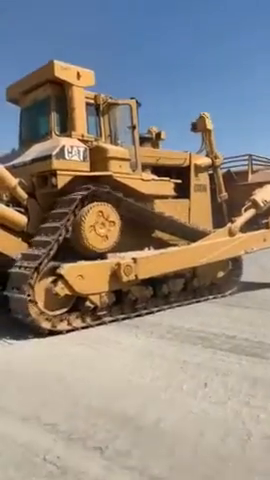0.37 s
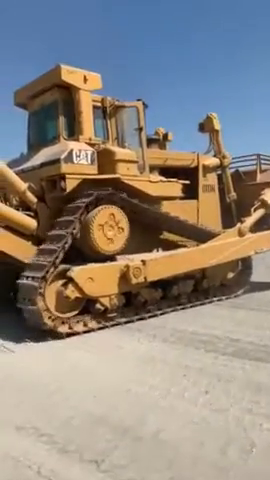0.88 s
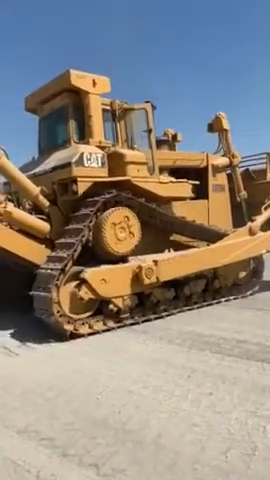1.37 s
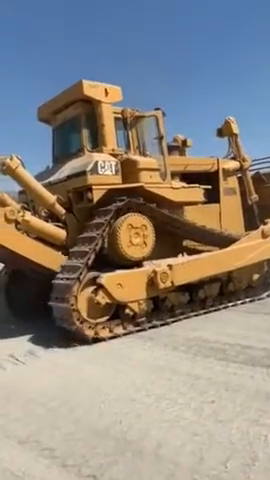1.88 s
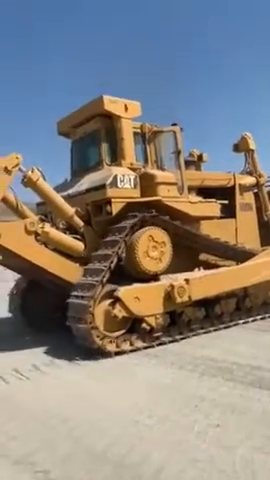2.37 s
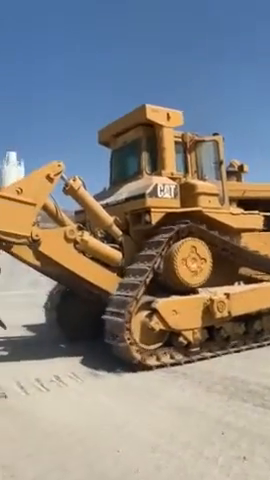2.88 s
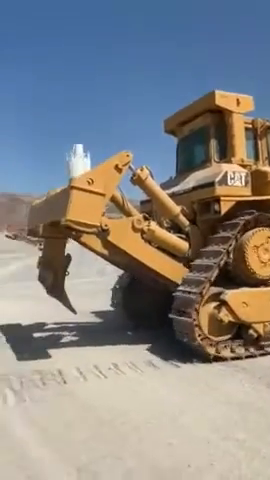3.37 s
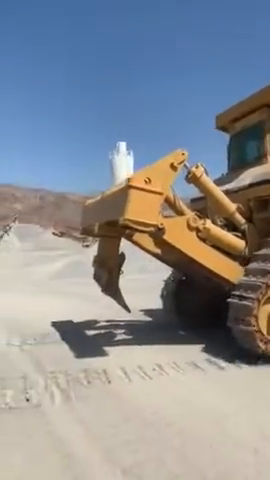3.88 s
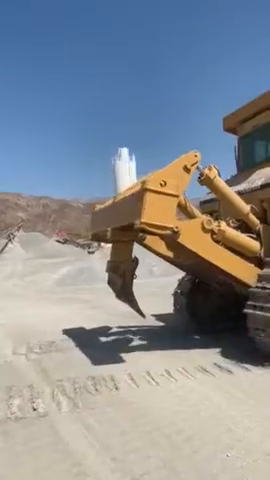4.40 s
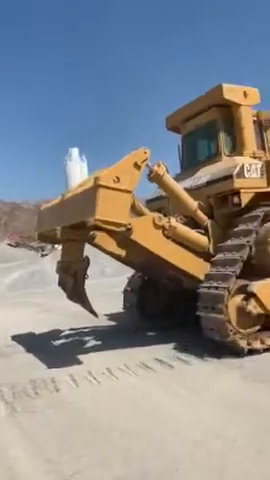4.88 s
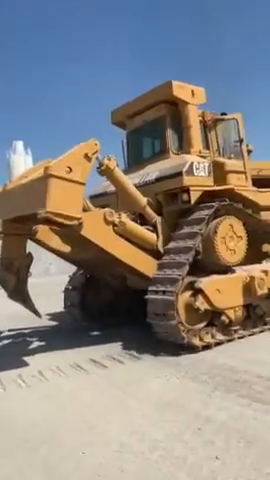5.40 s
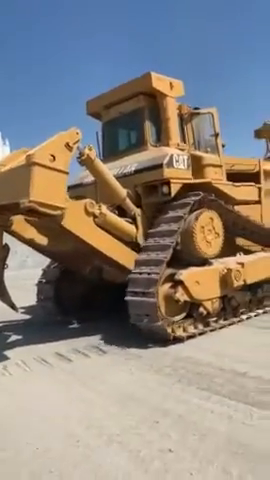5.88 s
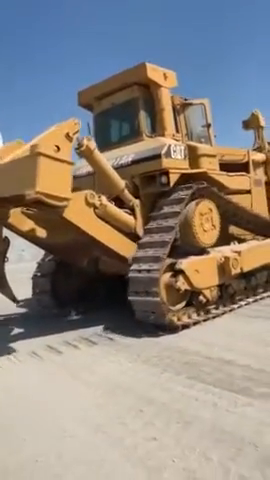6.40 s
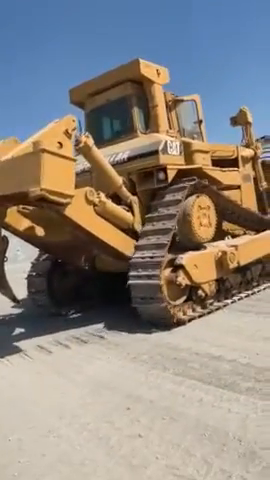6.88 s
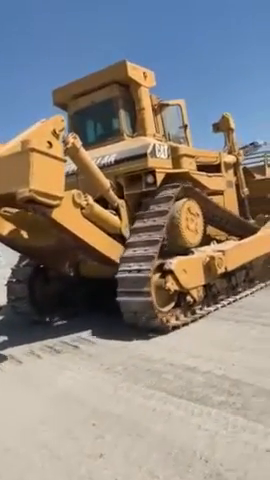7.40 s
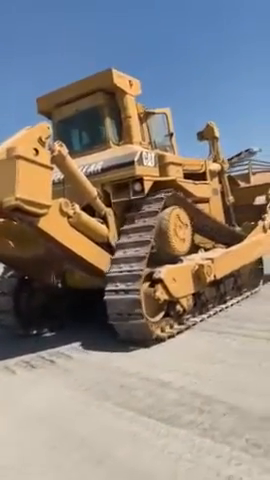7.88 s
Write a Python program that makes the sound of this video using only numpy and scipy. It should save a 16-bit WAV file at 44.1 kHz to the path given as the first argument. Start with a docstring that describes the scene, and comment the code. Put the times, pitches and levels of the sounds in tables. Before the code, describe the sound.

A large bulldozer diesel idles steadily in an open yard, heard close by a handheld stereo microphone moving from its side round to the rear. A low, even hum sits under dense metallic clatter and airy intake noise. Wind bumps the microphone in soft low puffs; a few dull crunches and tiny ticks come nearby. A faint whine slides slightly down around three seconds.

```python
"""A twelve-cylinder diesel idles in a yard as the listener walks from its side round its tail.
From the start: exhaust and gear sines, firings and contacts ringing block and panel, clatter and intake noise,
a loose rattle, and a breeze of low noise that gusts and puffs at two microphone ports.
Ticks (filtered clicks) and hisses (noise bursts) come from 0.1 s, pops of air from 0.5 s, crunches (noise
with ringing) from 1.4 s; a sine whine slides down after 2.3 s, as the corner is passed."""
import sys
import numpy as np
from scipy import signal
from scipy.fft import rfft, irfft, next_fast_len
from scipy.io import wavfile

SR = 44100
rng = np.random.default_rng(int(sys.argv[2]) if len(sys.argv) > 2 else 0)


def boost(x):
    """Linear amplitude factor 10**(x/20) for a level x in decibels (scalar or array-like)."""
    u = np.asarray(x, float) / 20
    return 10 ** u


def output_pcm(signal):
    """Save a mono or channel-first signal as 16-bit PCM at the path in sys.argv[1].

    Samples are clipped to [-1, 1] before scaling.
    """
    pcm = np.clip(np.atleast_2d(signal).T, -1, 1) * 32767
    wavfile.write(sys.argv[1], SR, np.round(pcm).astype(np.int16))


N = 353676

# Engine speed. Each row: time in seconds, firings per second.
SPEED = [(0, 96.4), (.5, 96.2), (1.25, 96.3), (1.75, 97.7), (2.05, 98.0), (2.4, 96.7), (3, 96.4),
         (3.5, 96.05), (4.5, 95.9), (5.25, 95.5), (6.5, 95.3), (7, 95.05), (8.02, 94.8)]
# The walk. Each row: time in seconds, place (0 beside, 1 corner, 2 and over behind).
WALK = [(0, 0.033), (2.2, 0.25), (2.7, 0.4), (3.3, 0.87), (4.8, 1.23), (5.6, 2.24), (8.02, 1.43)]

# Firings of one cycle. Each row: relative strength in dB, timing offset in firing gaps.
CYLINDERS = [(-4, 0.17), (11, 0.14), (27.5, -0.074), (-5, 0.018), (-3, 0.042), (3, 0.18), (-20, -0.18),
             (-20, -0.0085), (-12, 0.09), (11, 0.26), (21, -0.061), (2, 0.093)]

# Firing hum as the exhaust stack turns away. Each row: time in seconds, level in dB rms.
HUM = [(0, -17), (1.8, -17.5), (3.7, -17.5), (4.4, -20), (5.5, -18.5), (6.2, -20.5), (7.5, -24),
       (8.02, -20)]
# Brief sinking of the hum, mostly in head-on gusts. Each row: middle in seconds, length in seconds, change in dB.
HUM_DIPS = [(.47, .14, -2.5), (1.07, .1, -5), (2.22, .17, -14), (2.44, .2, -5), (4.8, .2, -2.5),
            (5.16, .14, -5.5), (5.63, .14, -4.5), (6.08, .17, -8), (6.53, .1, -5), (7.1, .12, -3)]
# Steady exhaust and gear tones, in multiples of the four-stroke cycle rate.
TONE_ORDERS = [6, 13, 15, 17, 18, 21, 24, 27, 32, 36, 42, 50, 51, 54, 61, 63, 69, 72, 78, 102, 105, 132,
               134]
# The same tones. Each row: level in dB rms beside, at the corner, behind.
TONES = [(-43, -35, -39), (-36, -30, -38), (-29, -30, -39.5), (-35, -32.5, -40.5), (-38, -47, -52),
         (-39, -36.5, -43), (-33, -30, -33), (-36.5, -35, -47.5), (-59, -33, -29.5), (-47, -41, -44),
         (-44, -41, -46), (-37.5, -39, -44), (-36.5, -40, -43), (-31, -30.5, -44.5), (-46, -36, -46),
         (-44, -40, -40), (-40.5, -44, -41), (-38, -39, -45), (-52, -42.5, -44), (-48, -31.5, -36),
         (-38, -41, -50), (-44, -40, -36), (-52, -42, -36.5)]
TONE_WOBBLE_TURNS_PER_ORDER = 0.0025

# Resonances of block and panels: centres in Hz.
BLOCK_HZ = [433, 505, 680, 800, 960, 1055, 1350, 1850, 2650]
# The same resonances. Each row: width in Hz, relative level in dB beside, at the corner, behind.
BLOCK = [(39.5, -4, 0, -4.5), (41, -0.5, -3.5, -3.5), (79, -6, -2.5, -3), (107, -1.5, -3.5, -4),
         (50, -4.5, -10.5, -17), (45.4, -9.5, -5.5, -9), (114, -11.5, -6, -10.5), (82.6, -7, -5.5, -8),
         (200, -21, -13, -16.5)]
# Knock level is before shading; firing and noise shares are relative to the contacts.
KNOCK_DB, KNOCK_NOISE_SHARE, KNOCK_FIRING_SHARE = -23.5, 1.2, 0.23

# Spectrum of clatter, fan and air noise. Each row: frequency in Hz, relative density in dB per Hz.
CLATTER = [(40, 10), (120, 8), (250, 2), (450, 2), (600, -1.5), (800, -1), (1200, 0.5), (1600, -2.5),
           (1900, -4.5), (2300, -10), (3000, -12.5), (4300, -20), (5200, -16), (6300, -22), (8400, -24.5),
           (11500, -29)]
CLATTER_DB, GATE_DEPTH = -22.5, .06  # level before shading; swell per rms of the firing envelope

# Air whistling through the intake: level before shading, in dB beside, at the corner, behind.
INTAKE_DB = (-36.5, -34, -36.5)
# Centre of the whistle. Each row: time in seconds, frequency in Hz.
INTAKE_PITCH = [(0, 3600), (1.0, 3700), (1.4, 3700), (2.2, 3400), (2.45, 3450), (2.65, 3650), (3.0, 3500),
                (5, 3550), (8.02, 3600)]
INTAKE_POLE_WIDTH_HZ = 440

# A rear panel drums. Each row: time in seconds, level in dB before throb and shading.
PANEL = [(0, -35), (2.2, -35), (2.6, -44), (5.9, -44), (6.35, -27.5), (7.2, -27.5), (8.02, -29)]
PANEL_HZ, PANEL_WIDTH_HZ, PANEL_THROB_DB = 792, 45, 4

# A blow three times a cycle: level before shading, in dB beside, at the corner, behind.
THRICE_DB = (-26, -27, -28)
# Its spectrum. Each row: frequency in Hz, relative density in dB per Hz.
THRICE_COLOUR = [(150, -7), (300, -0.5), (450, 0), (800, 3), (1100, -5), (1900, -12.5), (2600, -12),
                 (5000, -36)]
THRICE_DECAY_S = .025  # at 8 cycles per second
THRICE_FRESH, THRICE_UNEVEN_DB = .6, 2  # share of new noise; spread of strength between blows

# Shading of the machine noise in low, middle, top: dB beside, at the corner, behind.
LOW_SHADE_DB = (0.53, -1.9, 0.86)
MIDDLE_SHADE_DB = (0.78, -1.4, 0.08)
TOP_SHADE_DB = (.2, 0.32, -.2)
# Random waver of the shading: dB in low, middle, top.
SHADE_WAVER_DB = (.7, .35, .5)

# A loose metal part: level in dB rms beside, at the corner, behind.
RATTLE_DB = (-47, -54, -37)
RATTLE_HZ, RATTLE_WIDTH_HZ, RATTLES_PER_S = 2670, 230, 20

# Head-on gusts, rumbling on both ports. Each row: middle in seconds, length in seconds, level in dB.
GUSTS = [(.45, 0.13, -15), (.6, 0.1, -28), (1.07, 0.12, -23), (2.07, 0.055, -32), (2.22, 0.17, -29),
         (2.4, 0.18, -26), (4.82, 0.25, -33), (5.12, 0.3, -27.5), (5.63, 0.33, -26.5), (5.85, 0.1, -22),
         (6.1, 0.12, -32), (6.25, 0.18, -27), (6.53, 0.043, -23), (7.1, 0.12, -30), (7.57, 0.061, -39)]
# Spectrum of the rumble. Each row: frequency in Hz, relative density in dB per Hz.
BUFFET = [(20, 2), (45, 10.5), (70, 19.5), (110, 10.5), (200, 4.5), (400, -39)]
# Pitched puffs. Each row: middle in seconds, length in seconds, level in dB, centre in Hz.
PUFFS = [(0.18, 0.25, -25, 169), (1.118, 0.085, -18, 154), (1.29, 0.17, -24.5, 167), (2.116, 0.11, -13, 45),
         (2.18, 0.24, -19, 154), (2.34, 0.19, -26, 35), (3.854, 0.2, -25.5, 155), (4.348, 0.092, -28, 297),
         (4.613, 0.15, -18.5, 175), (4.95, 0.46, -24.5, 330), (5.11, 0.23, -21.5, 150),
         (5.295, 0.42, -30.5, 322), (5.92, 0.084, -27, 158), (6.53, 0.2, -28, 335),
         (6.708, 0.081, -27, 141), (7.67, 0.1, -26, 278), (7.794, 0.08, -23, 200),
         (7.882, 0.093, -19.5, 170), (7.983, 0.15, -24, 125)]
PUFF_SPAN = 1.48  # a puff's band runs from its centre over this to its centre times this
# Spectrum of the flutter. Each row: frequency in Hz, relative density in dB per Hz.
FLUTTER = [(60, -13), (130, -1.5), (200, -8), (350, -8), (600, -28.5), (1000, -74)]
# Cross gusts, pushing the ports apart. Each row: middle in seconds, length in seconds, level in dB.
CROSS = [(.42, 0.083, -34), (.88, 0.13, -22), (1.2, 0.17, -37), (2.62, 0.27, -31), (3.1, 0.083, -39),
         (3.37, 0.091, -29), (3.53, .1, -29), (5.5, 0.13, -29), (5.84, 0.14, -27), (6.1, 0.26, -30),
         (7.2, 0.081, -29), (7.4, 0.29, -23), (7.7, 0.27, -27), (7.92, 0.21, -31)]
# Spectrum of the cross part. Each row: frequency in Hz, relative density in dB per Hz.
CROSS_COLOUR = [(25, -19), (60, -4), (100, 10), (200, -1), (350, -3), (600, -57)]
CALM_DB, CALM_FLUTTER_DB, CALM_CROSS_DB, CALM_WAVER_DB = -31.5, -30.5, -51, 1

# Sharp ticks. Each row: time in seconds, relative click level in dB before filtering.
TICKS = [(.1135, -15), (.128, -19), (5.6997, -11), (6.258, -18)]
TICK_LOW_HZ, TICK_HIGH_HZ = 1000, 11000
TICK_BODY_HZ, TICK_BODY_T60_S, TICK_BODY_DB = 1200, .008, -2

# Bright hisses. Each row: start in seconds, relative level in dB, length in seconds.
HISS = [(.126, -22.5, .034), (3.855, -35, .012), (5.696, -21, .012), (6.065, -35, .02), (6.255, -27, .015)]
# Their spectrum. Each row: frequency in Hz, relative density in dB per Hz.
HISS_COLOUR = [(1000, -8), (2500, 2), (5000, -1), (7000, 0), (12000, -2), (14000, -30)]

# Single pops of the breeze. Each row: time in seconds, signed height, width in seconds.
POPS = [(.461, -.3, .003), (1.209, -.3, .002), (2.136, -.3, .002), (2.163, -.5, .002), (2.332, .6, .0025),
        (2.439, -.4, .002), (6.195, .3, .003)]

# Dull crunches nearby. Each row: start in seconds, relative level in dB, length in seconds.
CRUNCH = [(1.425, -8.5, .04), (2.214, -6.5, .04), (4.365, -15, .03), (4.6, -15, .05), (5.035, -11, .035)]
# Their spectrum. Each row: frequency in Hz, relative density in dB per Hz.
CRUNCH_COLOUR = [(150, -18), (400, 0), (900, -2), (1900, -8), (2600, -19), (6000, -40)]
# What they ring with. Each row: centre in Hz, width in Hz, relative level in dB.
CRUNCH_RING = [(436, 45, 0), (850, 60, -2.5), (1150, 90, -6), (1560, 80, -7), (1790, 80, -5)]
CRUNCH_RING_DB = 0  # ring over plain crunch

# A whine that slides down as the corner is passed. Each row: time in seconds, pitch in Hz, level in dB rms.
WHINE = [(0, 990, -70), (2.3, 990, -60), (2.45, 970, -36), (2.65, 975, -31.5), (2.95, 968, -32),
         (3.06, 940, -31), (3.2, 940, -33), (3.3, 940, -41), (3.45, 938, -36), (3.65, 942, -36),
         (3.9, 935, -60), (8.02, 935, -70)]

# The two ports. Each row: frequency in Hz, lead of the left in radians, power share of unshared sound.
PORTS = [(30, 0, .01), (150, -.2, .05), (300, -.45, .1), (750, -.9, .16), (1400, -.08, .003),
         (1750, .03, .003), (2400, .4, .3), (3100, 1.3, .7), (3600, 2.3, .45), (4150, 2.6, .3),
         (4600, 2.9, .1), (5100, 3.14, .025), (5600, 3.45, .05), (6000, 4.3, .2), (6600, 5.8, .08),
         (7200, 6.22, .004), (9300, 6.35, .004), (10000, 7.4, .3), (10500, 8.8, .15), (10900, 9.42, .002)]

# Brief sinking of the low middle, mostly in cross gusts. Each row: middle in seconds, length in seconds,
# change in dB.
LOW_DIPS = [(.86, .12, -6), (2.59, .14, -10), (3.6, .1, -5), (5.85, .2, -4), (7.2, .15, -4),
            (7.39, .13, -8.5)]
DIP_LOW_HZ, DIP_HIGH_HZ = 200, 605

CEILING = 1.7  # height that rounded peaks approach


def rms_one(x):
    """Scale to rms 1."""
    return x / np.sqrt(np.mean(x ** 2) + 1e-20)


def in_time(rows):
    """Columns of a curve, one value a sample."""
    s, *columns = np.transpose(rows)
    return [np.interp(np.arange(N) / SR, s, c) for c in columns]


def drift(rate_hz):
    """Slow random curve with spread 1: noise through two equal poles, made at every 40th sample."""
    r = np.exp(-80 * np.pi * rate_hz / SR)
    noise = rng.standard_normal(N // 40 + 2002)
    slow = signal.lfilter([1], [1, -2 * r, r * r], noise)[2000:]
    return np.interp(np.arange(N) / 40, np.arange(len(slow)), rms_one(slow))


def colour(x, spectrum):
    """Weight x by a spectrum of (Hz, dB) points; rms 1."""
    size = next_fast_len(N)
    hz = np.maximum(np.arange(size // 2 + 1) * SR / size, 1)
    point_hz, point_db = np.transpose(spectrum)
    gain = boost(np.interp(np.log(hz), np.log(point_hz), point_db))
    return rms_one(irfft(rfft(x, size) * gain, size)[..., :N])


def band(x, low_hz, high_hz):
    """Band-pass."""
    return signal.sosfilt(signal.butter(2, [low_hz, high_hz], "band", fs=SR, output="sos"), x)


def resonate(x, hz, width_hz):
    """A two-pole resonance; rms 1."""
    r = np.exp(-np.pi * width_hz / SR)
    return rms_one(signal.lfilter([1, 0, -1], [1, -2 * r * np.cos(2 * np.pi * hz / SR), r * r], x))


def seen_from(place, levels):
    """Value for the listener's place, between beside, corner and behind."""
    return np.interp(place, [0, 1, 2], levels)


def swell(middle_s, length_s):
    """A smooth rise and fall, 1 at its middle, 1/e at half a length either side."""
    out = np.zeros(N)
    first = max(int((middle_s - 2 * length_s) * SR), 0)
    last = min(int((middle_s + 2 * length_s) * SR), N)
    near = np.arange(first, last)
    out[near] = np.exp(-(2 * (near / SR - middle_s) / length_s) ** 2)
    return out


def dips(rows):
    """Level change in dB through time."""
    return sum(np.minimum(db, 0) * swell(s, length_s) for s, length_s, db in rows)


def firings(cycle):
    """One click a firing, with its cylinder's strength and timing plus scatter."""
    count = np.arange(int(12 * cycle[-1]) - 1)
    strength_db, offset = np.array(CYLINDERS)[count % 12].T
    chance = rng.standard_normal((len(count), 2))
    at = np.interp(count + .5 + offset, 12 * cycle, np.arange(N)) + 3.0 * chance[:, 0]
    clicks = np.zeros(N)
    clicks[np.clip(at.astype(int), 0, N - 1)] = boost(strength_db + 1.0 * chance[:, 1])
    return clicks


def valve_gear(cycle):
    """Small contacts as noise that repeats every cycle, part of it three times a cycle."""
    once = rng.standard_normal(1536)
    thrice = np.tile(rng.standard_normal(512), 3)
    return rms_one((once + .4 * thrice)[(cycle * 1536).astype(int) % 1536])


def tones(cycle, hum_db, place):
    """Exhaust and gear orders as sines locked to the cycle, wavering a little."""
    out = np.sqrt(2) * boost(hum_db + .6 * drift(5)) * np.sin(2 * np.pi * 12 * cycle)
    starts = rng.random(len(TONES))
    for order, levels_db, start in zip(TONE_ORDERS, TONES, starts):
        level_db = seen_from(place, levels_db) + 1.5 * drift(1.5)
        turns = order * (cycle + TONE_WOBBLE_TURNS_PER_ORDER * drift(2.32)) + start
        out += np.sqrt(2) * boost(level_db) * np.sin(2 * np.pi * turns)
    return out


def knock(clicks, contacts, place):
    """Pressure rises, valve gear and loose noise ring the block and panels; rms 1."""
    drive = KNOCK_FIRING_SHARE * rms_one(clicks) + contacts + KNOCK_NOISE_SHARE * rng.standard_normal(N)
    out = 0
    for k, (hz, (width_hz, *levels_db)) in enumerate(zip(BLOCK_HZ, BLOCK)):
        sign = (-1) ** k
        out = out + sign * boost(seen_from(place, levels_db)) * resonate(drive, hz, width_hz)
    return rms_one(out)


def clatter(gate, patchy_db):
    """Three unrelated noises swell with each firing; octaves flicker partly together, partly alone."""
    white = rng.standard_normal((2, 3, N)) * gate
    out, together = 0, drift(12.3)
    for k, low_hz in enumerate(32 * 2. ** np.arange(9)):
        flicker = boost(patchy_db * (0.5 * together + drift(20)))
        out = out + flicker * band(white[k % 2], low_hz, 2 * low_hz)
    return colour(out, CLATTER)


def intake(place):
    """Slow turbulence carried on the duct pitch: three unrelated narrow noises."""
    air = rng.standard_normal((2, 3, N))
    for _ in range(2):
        air = signal.lfilter([1], [1, -np.exp(-np.pi * INTAKE_POLE_WIDTH_HZ / SR)], air)
    phase = 2 * np.pi * np.cumsum(in_time(INTAKE_PITCH)[0]) / SR
    whistle = rms_one(air[0] * np.cos(phase) + air[1] * np.sin(phase))
    return boost(seen_from(place, INTAKE_DB) + 1.93 * drift(21)) * whistle


def panel(cycle, contacts):
    """Gear contacts and noise ring one panel, throbbing once a cycle."""
    drive = contacts + 1.4 * rng.standard_normal(N)
    throb_db = PANEL_THROB_DB * np.sin(2 * np.pi * cycle) + 2 * drift(10)
    return boost(in_time(PANEL)[0] + throb_db) * resonate(drive, PANEL_HZ, PANEL_WIDTH_HZ)


def thrice_a_cycle(cycle, place):
    """A ragged dying noise returns three times a cycle; each side of the machine has its own."""
    step = (cycle * 3072).astype(int) % 1024
    dying = np.exp(-np.arange(1024) / (24576 * THRICE_DECAY_S))
    blows = rng.standard_normal((3, 1024))
    strengths = boost(THRICE_UNEVEN_DB * rng.standard_normal(int(3 * cycle[-1]) + 1))
    strength = strengths[(3 * cycle).astype(int)]
    # power crossfade between the three sides
    heard = sum(np.sqrt(seen_from(place, share)) * blow[step] for share, blow in zip(np.eye(3), blows))
    heard = strength * dying[step] * (heard + THRICE_FRESH * rng.standard_normal(N))
    return boost(seen_from(place, THRICE_DB) + drift(3.8)) * colour(heard, THRICE_COLOUR)


def on_the_way(x, place):
    """Low, middle and top of the machine noise are shaded differently along the walk."""
    low = signal.lfilter(*signal.butter(2, 620, fs=SR), x)
    top = signal.lfilter(*signal.butter(2, 4500, "high", fs=SR), x)
    shades_db = (LOW_SHADE_DB, MIDDLE_SHADE_DB, TOP_SHADE_DB)
    swing = [boost(seen_from(place, shade_db) + waver_db * drift(2.2))
             for shade_db, waver_db in zip(shades_db, SHADE_WAVER_DB)]
    return swing[0] * low + swing[1] * (x - low - top) + swing[2] * top


def rattle(place):
    """A loose part chinks at random: dying noise bursts through one resonance."""
    hits = (rng.random(N) < RATTLES_PER_S / SR) * rng.standard_normal(N)
    envelope = signal.lfilter([1], [1, -np.exp(-1 / (0.04 * SR))], np.abs(hits))
    shaken = envelope * rng.standard_normal(N)
    return boost(seen_from(place, RATTLE_DB)) * resonate(shaken, RATTLE_HZ, RATTLE_WIDTH_HZ)


def gusting(rows, calm_db):
    """Gain of a wavering calm plus its gusts."""
    calm = boost(calm_db + CALM_WAVER_DB * drift(4.4))
    return calm + sum(boost(db) * swell(s, length_s) for s, length_s, db in rows)


def breeze():
    """Lumpy low noise: one part common to both ports, one of opposite sign at each."""
    lumps = rng.standard_normal((3, N)) * boost(1.8 * drift(14))
    flutter = colour(lumps[1], FLUTTER)
    common = gusting(GUSTS, CALM_DB) * colour(lumps[0], BUFFET)
    common += boost(CALM_FLUTTER_DB + CALM_WAVER_DB * drift(5.0)) * flutter
    for s, length_s, db, hz in PUFFS:
        shape = swell(s, length_s)
        puff = shape * band(flutter, hz / PUFF_SPAN, hz * PUFF_SPAN)
        common += boost(db) * puff * np.sqrt(np.sum(shape ** 2) / np.sum(puff ** 2))
    cross = gusting(CROSS, CALM_CROSS_DB) * colour(lumps[2], CROSS_COLOUR)
    return common, cross * [[1], [-1]]


def ticks():
    """Lone clicks over a wide treble band, each with a short ring."""
    clicks = np.zeros(N)
    for s, db in TICKS:
        clicks[int(s * SR)] = -2 * boost(db)
    r, w = boost(-60 / (TICK_BODY_T60_S * SR)), 2 * np.pi * TICK_BODY_HZ / SR
    body = signal.lfilter([0, np.sin(w)], [1, -2 * r * np.cos(w), r * r], clicks + 1e-18)
    return band(clicks, TICK_LOW_HZ, TICK_HIGH_HZ) + boost(TICK_BODY_DB) * body


def bursts(rows, spectrum, grain_db):
    """Short grainy noise bursts with a quick rise and a dying end."""
    shape, t = np.zeros(N), np.arange(N) / SR
    for s, db, length_s in rows:
        u = np.maximum(t - s, 0) / length_s
        shape += boost(db) * .5 * np.minimum(8 * u, 1) * np.exp(-u ** 3)
    grains = rng.standard_normal(N) * boost(grain_db * drift(110))
    return shape * colour(grains, spectrum)


def hisses():
    """Brief bright bursts of noise."""
    return bursts(HISS, HISS_COLOUR, grain_db=1.5)


def pops():
    """A short push of air, either sign, with an opposite dip on each side."""
    out = np.zeros(N)
    for s, height, width_s in POPS:
        u = (np.arange(N) / SR - s) / width_s
        out += height * (1 - u ** 2) * np.exp(-u ** 2)
    return out


def crunches():
    """Grainy bursts that also set a few resonances ringing."""
    grit = bursts(CRUNCH, CRUNCH_COLOUR, grain_db=1.5)
    ring = sum(boost(db) * resonate(grit, hz, width_hz) for hz, width_hz, db in CRUNCH_RING)
    return .72 * (grit + boost(CRUNCH_RING_DB) * np.std(grit) * rms_one(ring))


def whine():
    """A rough sine whose pitch and level tremble."""
    hz, db = in_time(WHINE)
    phase = 2 * np.pi * np.cumsum(hz + 4 * drift(12)) / SR
    return np.sqrt(2) * boost(db + 2.0 * drift(12)) * np.sin(phase)


def ports(direct, own):
    """Each port hears the same wave with a phase lead, plus scattered sound of its own."""
    size = next_fast_len(N)
    hz = np.arange(size // 2 + 1) * SR / size
    at_hz, lead_rad, own_share = np.transpose(PORTS)
    turn = np.exp(.5j * np.interp(hz, at_hz, lead_rad) * [[1], [-1]])
    share = np.clip(np.interp(hz, at_hz, own_share), 0, 1)
    mixed = np.sqrt(1 - share) * turn * rfft(direct, size) + np.sqrt(share) * rfft(own, size)
    return irfft(mixed, size)[:, :N]


def dipped(x, dip_db):
    """The low middle of the sound sinks by dip_db."""
    sos = signal.butter(2, [DIP_LOW_HZ, DIP_HIGH_HZ], "band", fs=SR, output="sos")
    return x + (boost(dip_db) - 1) * signal.sosfiltfilt(sos, x)


def scene():
    """Engine, near bursts and breeze at two ports."""
    place, = in_time(WALK)
    cycle = np.cumsum(in_time(SPEED)[0]) / SR / 12
    clicks, contacts = firings(cycle), valve_gear(cycle)
    hum = tones(cycle, in_time(HUM)[0] + dips(HUM_DIPS), place)

    # pressure dies after each firing
    pressure = signal.lfilter([1], [1, -np.exp(-1 / (0.006 * SR))], clicks)
    gate = 1 + GATE_DEPTH * rms_one(pressure)
    # row 0 reaches both ports; rows 1 and 2 belong to one port each
    noise = boost(CLATTER_DB) * clatter(gate, patchy_db=2.0) + intake(place)
    noise[0] += boost(KNOCK_DB) * knock(clicks, contacts, place)
    noise[0] += panel(cycle, contacts) + thrice_a_cycle(cycle, place)
    noise = on_the_way(noise, place)

    common, cross = breeze()
    near = ticks() + hisses() + crunches()
    direct = hum + rattle(place) + noise[0] + near + whine()
    heard = ports(direct, noise[1:]) + common + pops()
    return dipped(heard, dips(LOW_DIPS)) + cross


def low_pass(x):
    """Removes everything above the highest recorded frequency."""
    return signal.sosfilt(signal.butter(12, 11600, fs=SR, output="sos"), x)


def record(dry):
    """Peaks are rounded towards a ceiling."""
    mix = CEILING * np.tanh(dry / CEILING)
    return low_pass(mix)


dry = scene()
out = record(dry)
output_pcm(out)
```